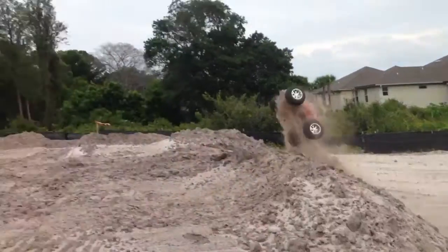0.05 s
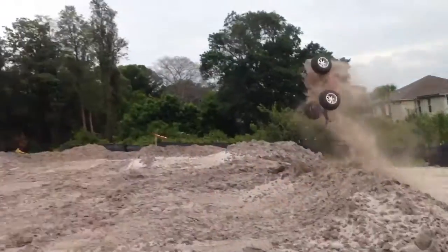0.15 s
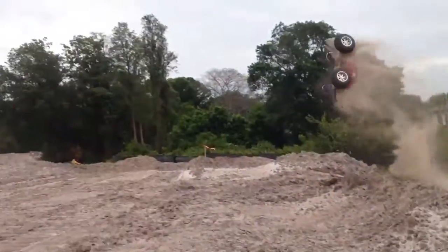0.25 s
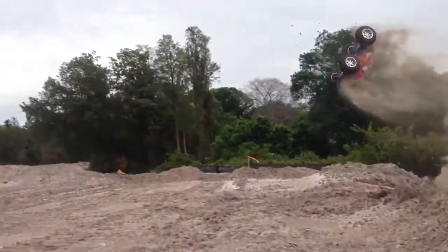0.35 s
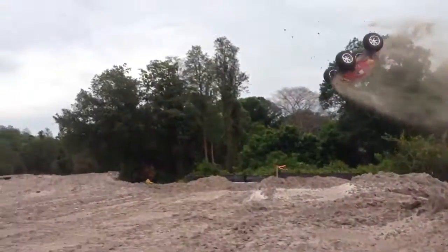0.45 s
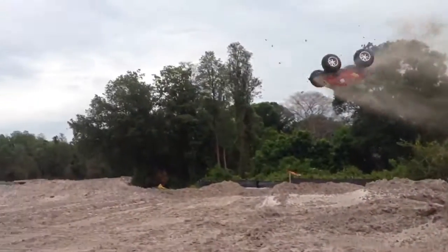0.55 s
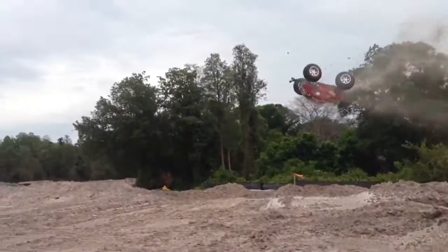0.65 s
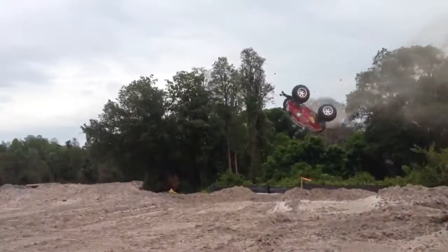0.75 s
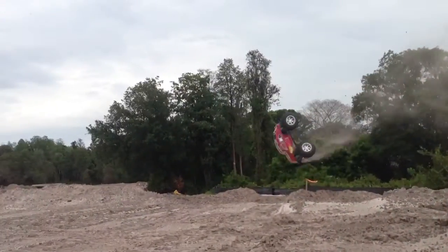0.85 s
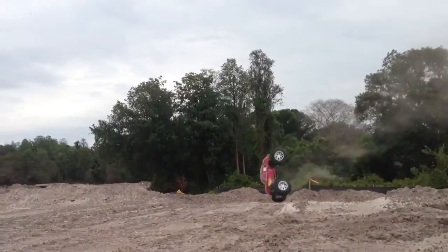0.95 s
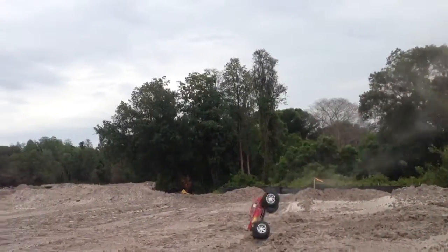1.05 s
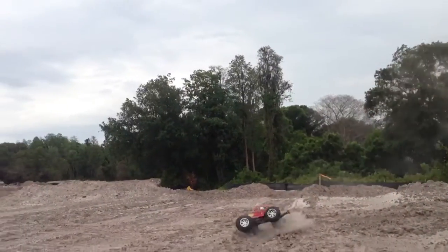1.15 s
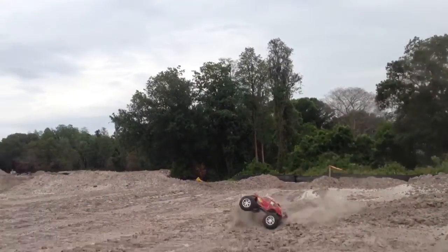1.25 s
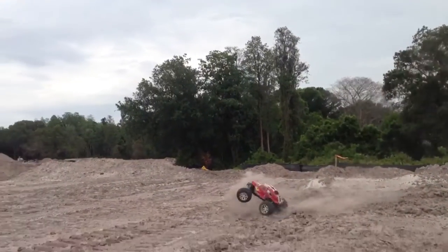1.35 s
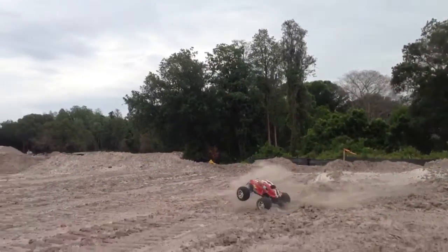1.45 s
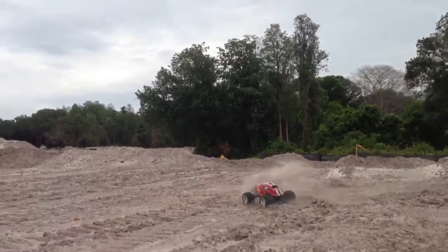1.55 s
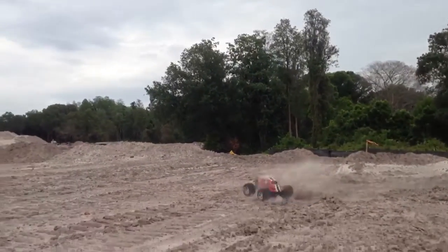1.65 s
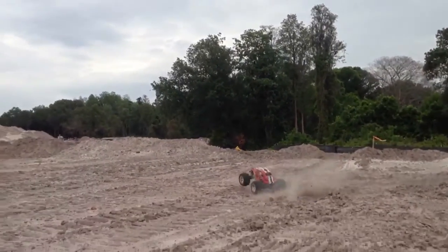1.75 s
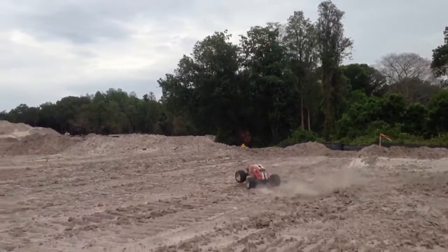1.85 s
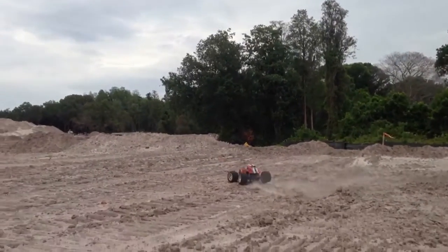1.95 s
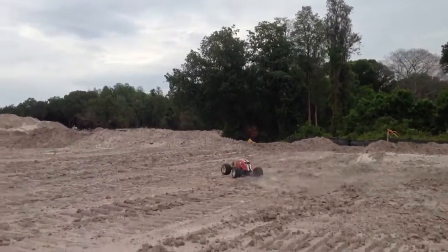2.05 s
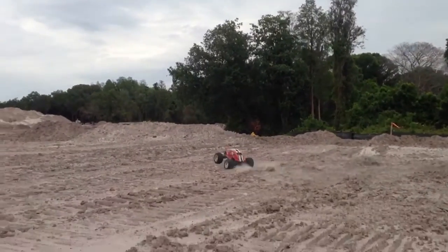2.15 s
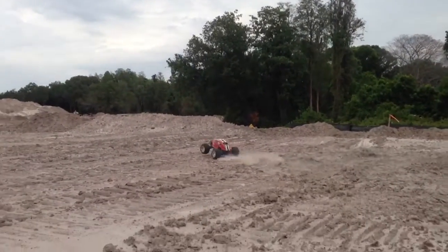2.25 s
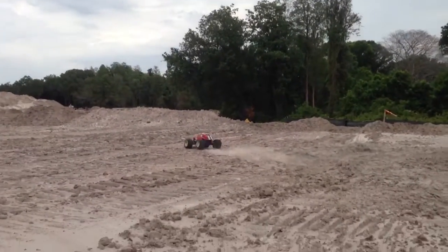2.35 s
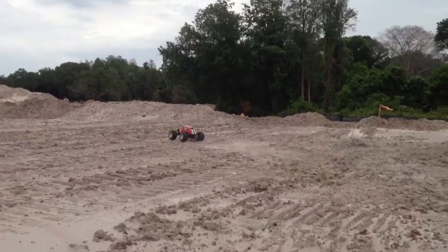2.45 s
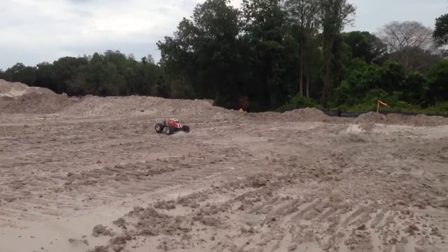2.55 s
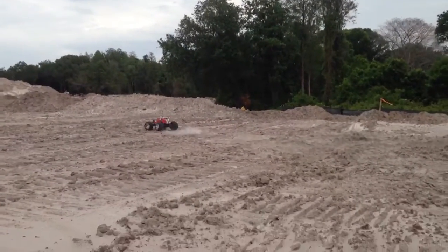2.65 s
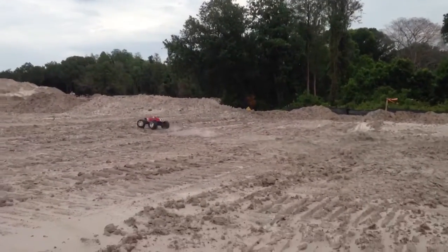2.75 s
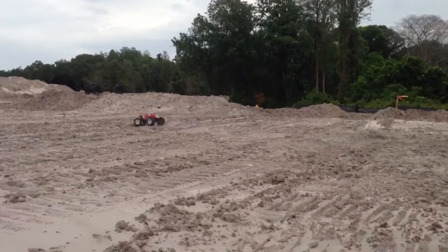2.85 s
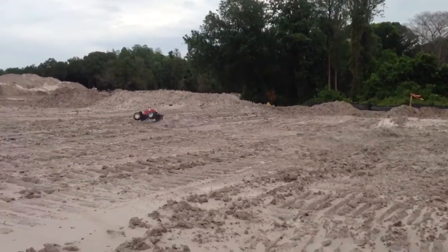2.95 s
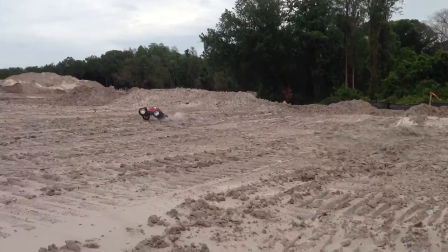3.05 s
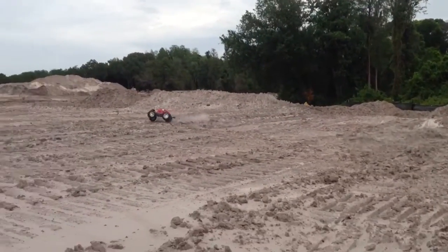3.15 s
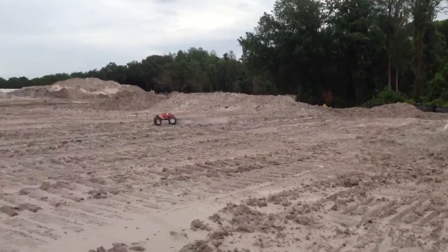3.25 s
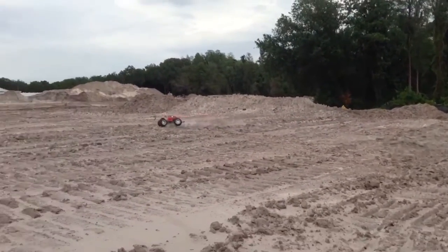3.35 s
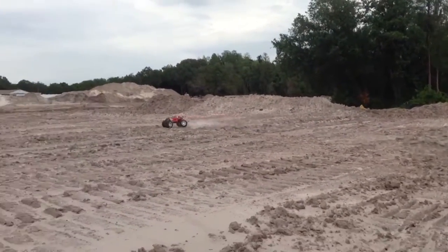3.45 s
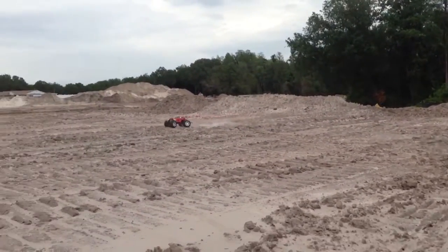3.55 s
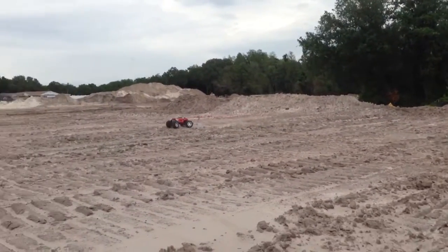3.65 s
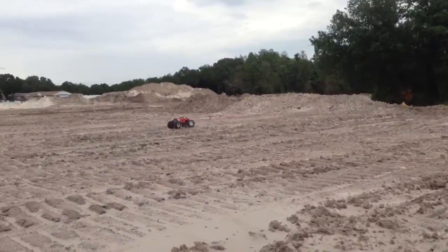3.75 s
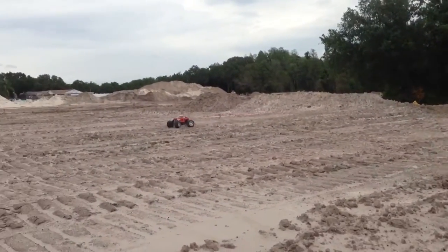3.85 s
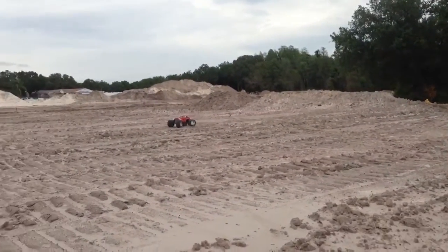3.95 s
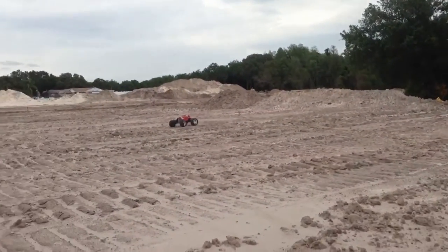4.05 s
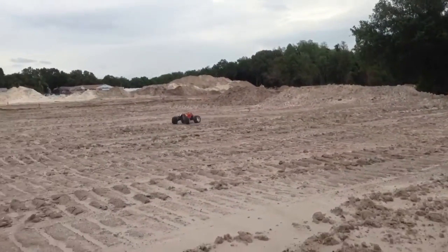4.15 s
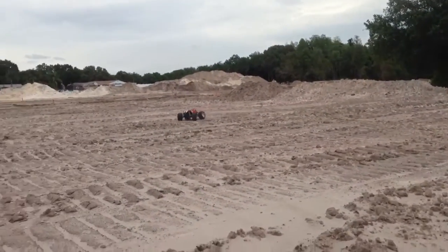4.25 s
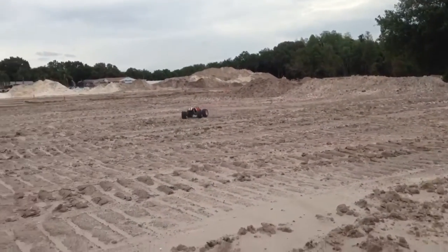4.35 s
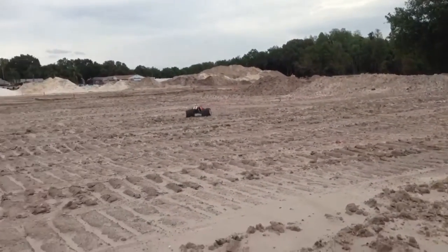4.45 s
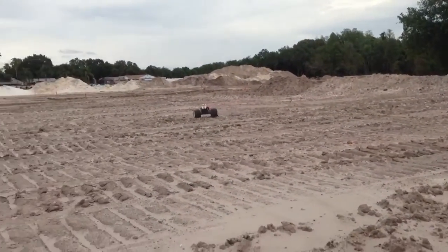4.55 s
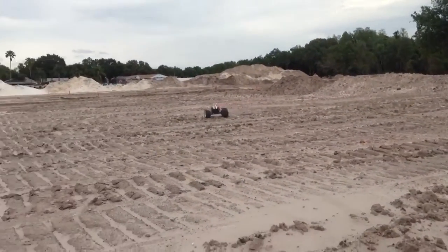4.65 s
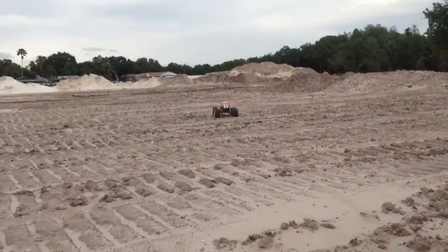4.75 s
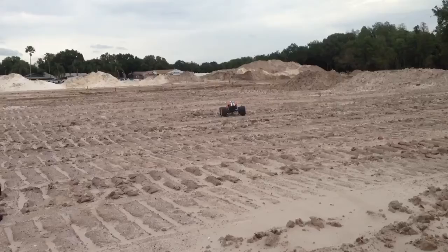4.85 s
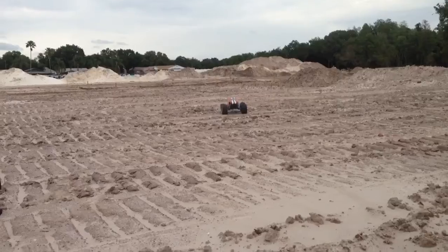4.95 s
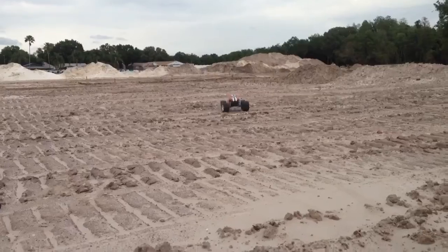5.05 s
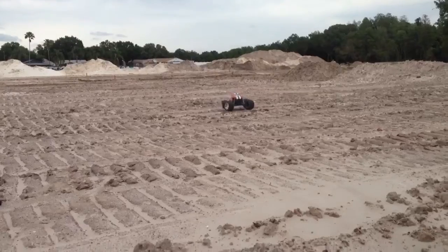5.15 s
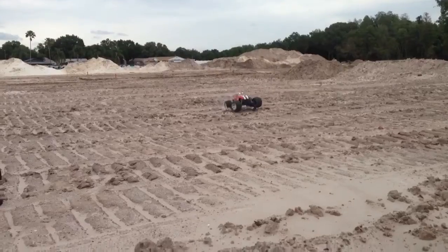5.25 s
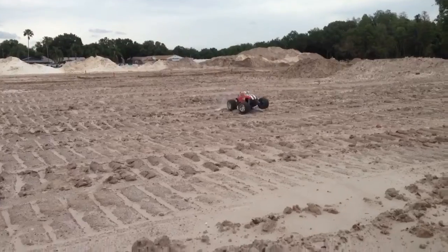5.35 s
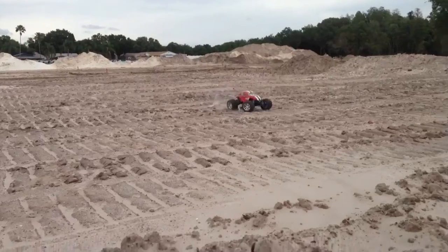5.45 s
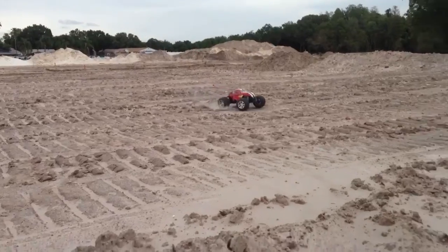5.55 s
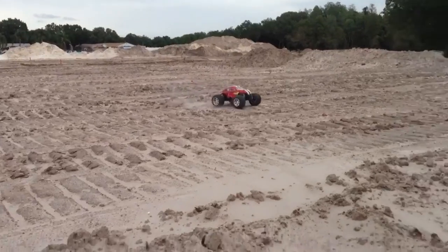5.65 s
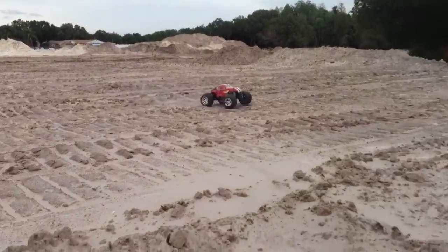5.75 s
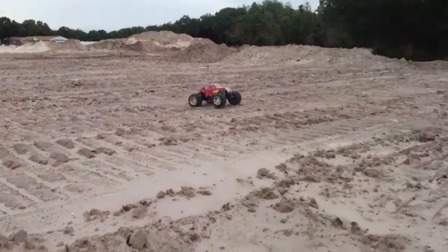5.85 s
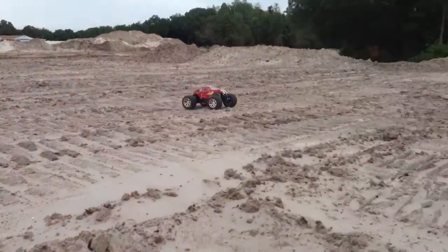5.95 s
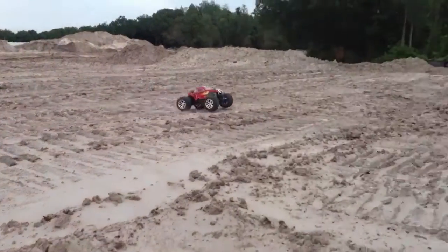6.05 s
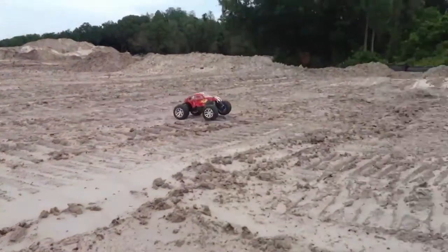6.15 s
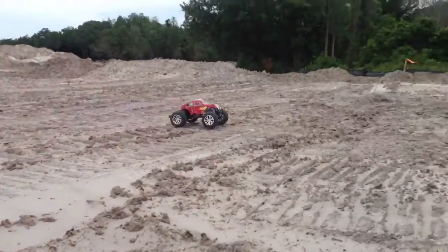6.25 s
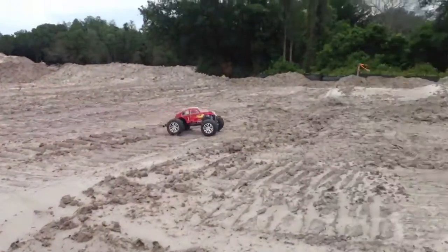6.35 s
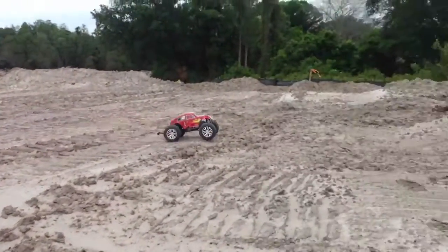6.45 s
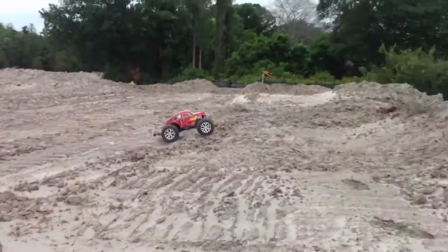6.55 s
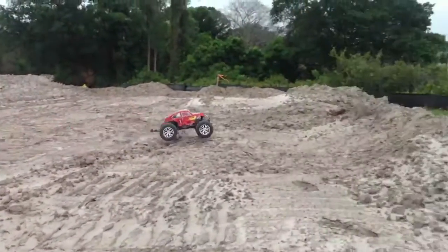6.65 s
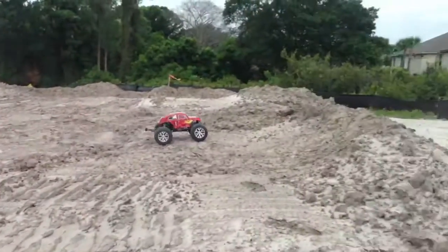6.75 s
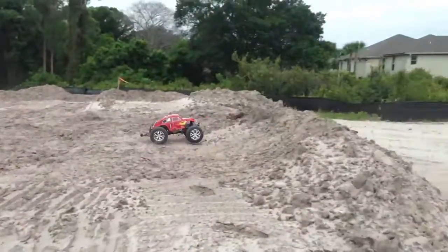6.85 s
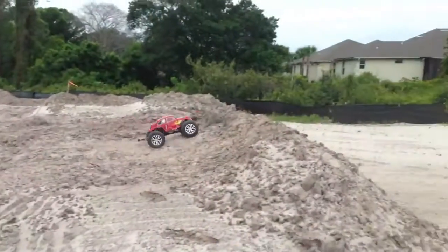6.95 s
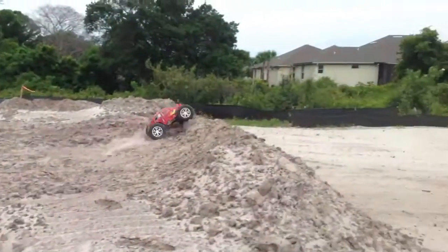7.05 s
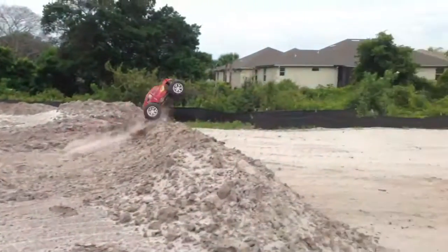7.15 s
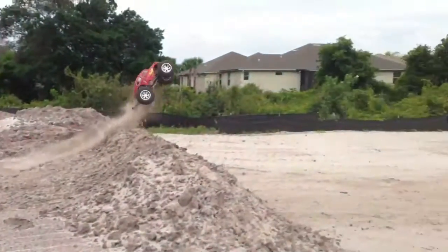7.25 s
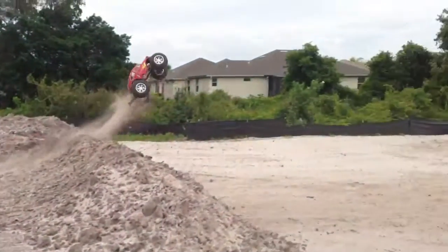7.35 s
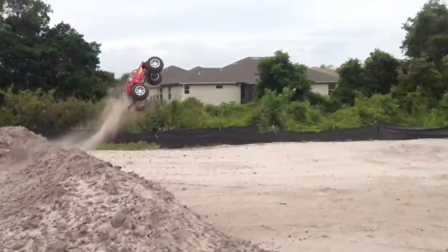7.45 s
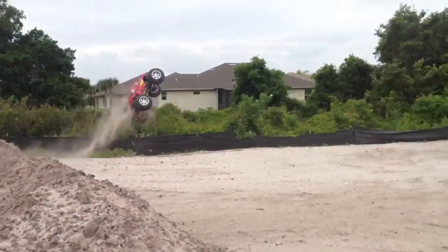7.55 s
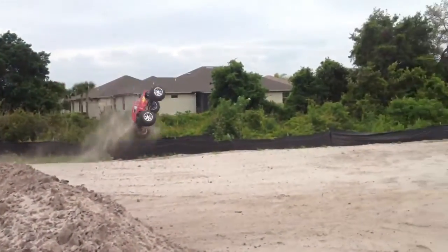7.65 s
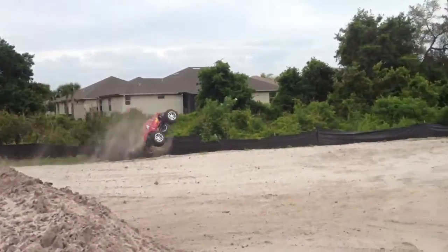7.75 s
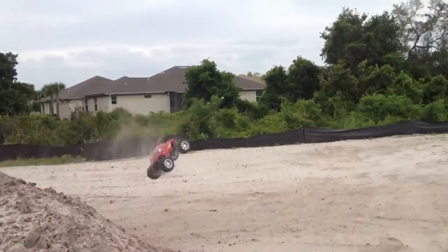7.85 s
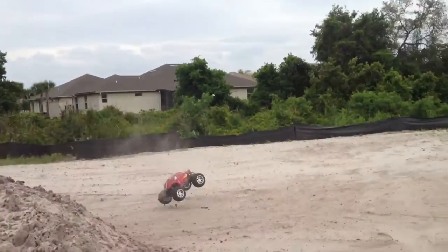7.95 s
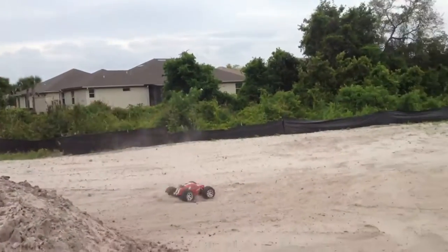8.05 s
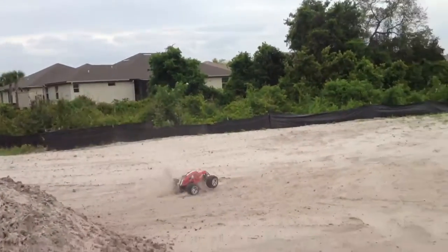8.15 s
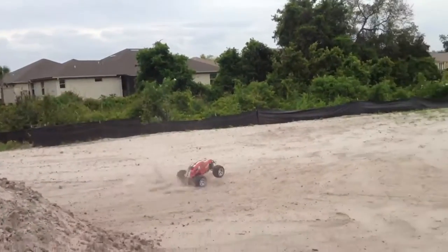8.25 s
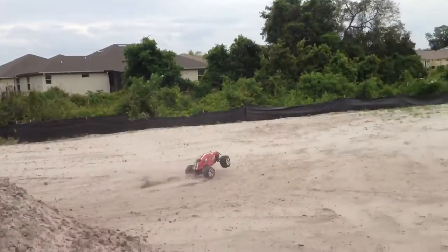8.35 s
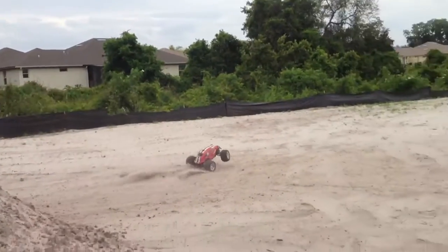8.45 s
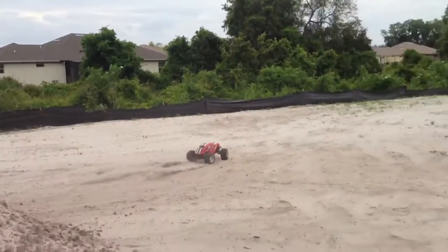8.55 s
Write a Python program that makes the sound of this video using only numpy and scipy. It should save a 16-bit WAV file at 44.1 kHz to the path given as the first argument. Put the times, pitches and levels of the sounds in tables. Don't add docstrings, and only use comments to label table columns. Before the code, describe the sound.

A radio-controlled electric truck screams off a dirt mound with a bright, raspy gear whine, flies, then lands with low damped thuds. Short revs chirp as its wheels slip, and it grows quiet farther away. It returns buzzing over ruts, revs hard for a second jump, lands and pulls away. Open ground, faint distant traffic, one microphone some metres off, almost no echo.

```python
import sys
import numpy as np
from scipy import signal
from scipy.fft import rfft, irfft, next_fast_len
from scipy.io import wavfile
from scipy.ndimage import uniform_filter1d

SR = 44100
rng = np.random.default_rng(int(sys.argv[2]) if len(sys.argv) > 2 else 0)


def store_wav(level_fs):
    pcm = np.round(np.clip(np.atleast_2d(level_fs), -1, 1) * 32767)
    wavfile.write(sys.argv[1], SR, pcm.T.astype(np.int16))


def invert_db(level):
    return 10 ** (np.asarray(level, dtype=float) / 20)


N = 378819
TIME_S = np.arange(N) / SR
CONTROL_S = np.arange(0, N + 32, 32) / SR
PINION_TEETH = 11.5


def level(x, db):
    return x * invert_db(db) / np.sqrt(np.mean(x ** 2))


def smooth(control):
    return np.interp(TIME_S, CONTROL_S, control)


def curves(spans):
    s, *columns = np.vstack(spans).T
    return [np.interp(TIME_S, s, column) for column in columns]


def walk(rate):
    hold = max(int(SR / rate), 1)
    steps = np.repeat(rng.standard_normal(N // hold + 1), hold)
    return 1.3 * uniform_filter1d(uniform_filter1d(steps, hold), hold)[:N]


def colour(x, points):
    hz, db = np.transpose(points)
    size = next_fast_len(N)
    f = np.maximum(np.arange(size // 2 + 1) * SR / size, 1)
    gain = invert_db(np.interp(np.log(f), np.log(hz), db))
    return irfft(rfft(x, size) * gain, size)[:N]


def ring(x, modes):
    out = 0
    for k, (hz, width, db) in enumerate(modes):
        b, a = signal.iirpeak(hz, hz / width, SR)
        twice = signal.lfilter(b, a, signal.lfilter(b, a, x))
        out = out + (-1) ** k * invert_db(db + 2.4 * walk(12)) * twice
    return out


# (f/Hz, level/dB)
FIELD_SPECTRUM = [(15, -60), (30, -50), (75, -10), (134, 4), (180, 1), (305, -10), (598, -20), (722, -17),
                  (782, -28), (848, -17), (1570, -31), (5280, -26.5), (7700, -30.5), (8810, -27),
                  (11500, -26), (15500, -28)]


def field():
    flicker = invert_db(.8 * walk(1.5) + 2.2 * walk(10))
    air = colour(rng.standard_normal(N), FIELD_SPECTRUM)
    rumble = signal.sosfilt(signal.butter(2, 350, fs=SR, output="sos"), air)
    return level(air + rumble * (flicker - 1), -60.27)


# (t/s, tooth mesh f/Hz, whine level/dB re shell, overtone level/dB re whine)
SPEED = [(.2, 2330, 0, -8), (.3, 2400, -2, -14), (1.15, 2480, -3, -14), (1.2, 1945, -1, -10),
         (1.29, 1900, -3, -10), (1.55, 650, -5, -3), (2.9, 800, -6, -3), (4.2, 880, -4, 1),
         (4.7, 900, -4, 1), (4.85, 1000, 3, -7), (5.2, 1140, -4, -5), (5.5, 950, -3, -2),
         (5.72, 1070, -1, -3), (6.09, 1290, -3, -2), (6.5, 1440, -3, -2), (6.95, 1500, -4, -3)]
# (t/s, mesh f/Hz, whine level/dB re shell, overtone level/dB)
REVS = [
    [(0, 1950, -2, -2), (.032, 2220, 1, -1), (.058, 2130, 2, 0), (.07, 1930, -2, 0), (.11, 2190, 0, 1),
     (.15, 2000, 1, -1)],
    [(1.615, 640, 0, 0), (1.66, 940, -1, 0), (1.685, 940, 1, 0), (1.705, 1060, 3, -1), (1.74, 1050, 3, -4),
     (1.765, 1450, 4, -2), (1.79, 1540, 1, 0), (1.9, 1000, -6, -3)],
    [(2.085, 860, 2, -3), (2.13, 1200, 5, -4), (2.15, 1345, 6, -4), (2.2, 1360, 7, -5), (2.23, 1500, 8, -7),
     (2.275, 1490, 8, -9), (2.31, 1270, 4, -8), (2.42, 1000, -7, -3)],
    [(2.52, 1100, 4, -4), (2.58, 1450, 7, -8), (2.62, 1400, 8, -11), (2.66, 1350, 7, -11),
     (2.69, 1180, -2, -6)],
    [(3.02, 900, 0, 0), (3.05, 1165, -2, -2), (3.075, 1165, -4, -3), (3.1, 1480, -1, 0),
     (3.18, 1500, -2, -2), (3.3, 1000, -5, -3)],
    [(7.05, 1790, 1, -1), (7.083, 1900, 1, 0), (7.102, 2060, 2, -1), (7.13, 1770, 0, 0),
     (7.147, 2060, 3, 0), (7.166, 2510, 2, 0), (7.196, 2480, 2, 0), (7.223, 1790, 3, 1),
     (7.232, 2130, 0, -3), (7.27, 2050, 0, -6), (7.5, 2050, -3, -10)],
    [(7.7, 1250, -3, -3), (8.17, 800, -6, -3), (8.2, 1000, 4, -8), (8.25, 1140, -1, -2),
     (8.33, 1250, 0, -3), (8.5, 1320, 1, -3), (8.58, 1050, -1, -3)],
]


def speed():
    mesh_hz, sing_db, overtones_db = curves(sorted(SPEED + sum(REVS, [])))
    return uniform_filter1d(mesh_hz, size=250), sing_db, overtones_db


# (multiple of mesh rate, level/dB re shell)
ORDERS_HEARD = [(.63, -24), (1, -7.5), (1.45, -8), (2, -8), (2.9, -8), (3.02, -15), (4, -14), (4.4, -13),
                (5.8, -11)]
# (f/Hz, level/dB)
BODY = [(600, -3), (1400, 1), (2500, 4), (3100, 0), (4200, -1), (5100, 6), (8000, 8), (9500, -4),
        (11500, -34)]
# (t/s, level/dB, unused; every chirp rises by CHIRP_DB)
CHIRPS = [(4.3583, -53), (4.4282, -50), (4.4805, -47), (4.5309, -45), (4.6057, -47), (4.6716, -48),
          (4.7055, -49), (4.7983, -48), (4.8542, -48), (4.8991, -49), (5.0517, -47), (5.1106, -43),
          (5.2223, -41), (5.388, -49), (5.4987, -48), (5.5571, -49), (5.6244, -42), (5.6883, -45),
          (5.7397, -45), (5.7741, -48), (5.817, -43), (5.8998, -44), (5.9816, -36), (6.0644, -38),
          (6.1043, -38), (6.2814, -40), (6.3623, -44), (6.4785, -39)]
CHIRP_DB, CHIRP_MS = 7.5, 11
SECOND_STAGE = 1.45
UNLOADED_DB, COASTING_DB = -5, -2.5
LOAD_SINGS, HEAVY_DB = .25, -44


def whine(shell_db, mesh_hz, sing_db, overtones_db):
    turn = 2 * np.pi * np.cumsum(mesh_hz * (1 + .008 * walk(40) + .005 * walk(90))) / SR
    wobble = 1 + 0.44 * np.sin(turn / PINION_TEETH)
    chirps = sum(np.exp(-.5 * ((CONTROL_S - s - .012) * 1000 / CHIRP_MS) ** 2) for s, _ in CHIRPS)
    pushing = smooth(sum((CONTROL_S > rev[0][0]) & (CONTROL_S < rev[-1][0]) for rev in REVS))
    out = 0
    for multiple, db in ORDERS_HEARD:
        slack = .55 * np.sqrt(multiple) * walk(120)
        fades_most = multiple == SECOND_STAGE or multiple >= 4
        db = db + (1 - pushing) * (COASTING_DB + UNLOADED_DB * fades_most)
        db = db + overtones_db * (multiple > 1.1) + 3 * walk(45) + 2 * walk(110)
        out = out + invert_db(db) * np.sin(multiple * turn + slack)
    sing_db = sing_db + CHIRP_DB * smooth(chirps) + LOAD_SINGS * np.maximum(shell_db - HEAVY_DB, 0)
    return invert_db(shell_db - 1.5 + sing_db) * wobble * colour(out, BODY), turn


# (t/s, level/dB, shell level/dB re clatter as the truck turns)
ROLL = [(0.0, -40.6, -6.7), (0.3, -42.8, -1.5), (0.5, -43.6, -6.5), (1.1, -46.6, -6.5), (1.4, -69.5, 2.5),
        (2.4, -58.2, -9.2), (3.55, -65.7, -8.1), (4.03, -68.9, -15.5), (4.2, -50.5, -16),
        (4.6, -49.5, -10.0), (5.1, -46.2, -11.3), (5.4, -48.0, -14.1), (6.0, -36.8, -12.0),
        (6.9, -40.1, -13.0), (7.4, -80.0, -12.5), (8.0, -53.3, -9.3), (8.3, -41.5, -12.4),
        (8.59, -39.5, -10.7)]
# (peak t/s, peak level/dB, 20 dB rise t/s, 20 dB fall t/s, shell level/dB re clatter)
BURSTS = [(0.085, -26.3, 0.082, 0.244, -10.5), (1.175, -28.5, 0.039, 0.137, -3.9),
          (1.276, -40.8, 0.488, 0.28, -6.0), (1.574, -40.4, 0.037, 0.358, -21.1),
          (1.736, -32, 0.177, 0.106, -9.2), (1.91, -45.2, 0.036, 0.042, -6.0),
          (2.133, -34.1, 0.15, 0.204, -12.3), (2.532, -40.0, 0.105, 0.245, -13.5),
          (2.838, -52.5, 0.033, 0.046, -13.3), (3.067, -35.8, 0.086, 0.088, -9.7),
          (3.158, -39.0, 0.23, 0.075, -11.2), (3.403, -54.2, 0.6, 0.092, -13.6),
          (3.727, -48.3, 0.13, 0.301, -11.3), (3.994, -60.5, 0.187, 0.03, -13.0),
          (4.16, -49.4, 0.162, 0.599, -10.2), (5.196, -44.0, 0.174, 0.119, -6.1),
          (6.026, -39.2, 0.03, 0.121, -9.4), (6.434, -33, 0.121, 0.31, -19.2),
          (7.1, -28, 0.13, 0.147, -10.7), (7.18, -29.5, 0.06, 0.25, -5.9),
          (7.434, -46.0, 0.03, 0.408, -8.6), (7.738, -39, 0.143, 0.222, -11.0),
          (8.092, -41.4, 0.07, 0.144, -10.4), (8.2, -38.5, 0.03, 0.2, -11.7)]


def load(mesh_hz):
    roll_db, facing_db = curves(ROLL)
    power, ringing = 0, 0
    for s, db, rise, fall, shell_db in BURSTS:
        away = np.where(CONTROL_S < s, (s - CONTROL_S) / rise, (CONTROL_S - s) / fall)
        burst = invert_db(db - 20 * np.minimum(away, 4) ** 1.5) ** 2
        power = power + burst
        ringing = ringing + burst * invert_db(shell_db) ** 2
    effort_db = 10 * np.log10(invert_db(roll_db) ** 2 + smooth(power))
    shell_db = .2 + 10 * np.log10(invert_db(roll_db + facing_db) ** 2 + smooth(ringing))
    chassis_db = -58 + .66 * (effort_db + 45) - 2.2 * np.log2(mesh_hz / 1400)
    return effort_db, shell_db, chassis_db


def teeth(turn, scatter_db, knock):
    tooth = (turn / (2 * np.pi)).astype(int)
    force = invert_db(scatter_db * rng.standard_normal(N)[tooth])
    runout = 1 + knock * np.sin(turn / PINION_TEETH + 1.08 * walk(20))
    return rng.standard_normal(N) * force * runout


# (f/Hz, level/dB per Hz)
CLATTER = [(1760, -31), (3000, -15.5), (4320, -22.5), (4690, -18), (5020, -12.5), (7030, -4), (7800, 4.5),
           (8640, -8), (9390, -9), (10300, -13.5), (11600, -30.5), (12800, -30), (15500, -38)]
# (f/Hz, width f/Hz, level/dB)
SHELL = [(2050, 505, 12), (2480, 635, 14.5), (3150, 910, 1.5), (4000, 1350, 6.5)]
# (f/Hz, width f/Hz, level/dB)
CHASSIS = [(665, 146, 4.5), (1000, 285, 4.5), (1250, 240, 4), (1580, 530, 4)]


def clatter(turn, clatter_db, shell_db, chassis_db):
    bright = colour(teeth(turn, 2.2, .12), CLATTER)
    shell = ring(teeth(turn, 2.5, .2), SHELL) * invert_db(1.5 * walk(30))
    chassis = ring(teeth(turn, 2.5, .2), CHASSIS) * invert_db(2 * walk(25))
    return level(bright, clatter_db - .3) + level(shell, shell_db - 4.0) + level(chassis, chassis_db - 6.0)


# (t/s, change of level/dB)
HOPS = [(0.062, -4), (0.108, -4), (1.237, -7.8), (1.32, -10.8), (1.395, -11.8), (1.531, -10.8),
        (1.8, -10.0), (1.884, -7.3), (2.304, -11.6), (2.389, -6.5), (2.761, -10.8), (2.936, -11.9),
        (2.994, -10.6), (3.216, -9.2), (3.418, -7.7), (4.507, -7.2), (5.371, -7.7), (5.54, -6.0), (5.6, -7),
        (6.042, -8.9), (6.09, -6.0), (6.859, -6.7), (6.968, -6.0), (7.021, -7.9), (7.305, -6.0),
        (7.855, -9.4), (7.973, -5.6), (8.12, -13.4), (8.144, -7.7), (8.562, -7.7)]
# (t/s, change of level/dB)
BUMPS = [(0.13, 2.5), (0.371, 4.9), (0.773, 3.7), (1.447, 4), (1.839, 8.3), (1.934, 12.7), (1.961, 13.6),
         (2.357, 9.9), (2.556, 7.7), (2.6, 5), (2.727, 6), (2.864, 5.5), (2.958, 3.3), (3.223, 14.0),
         (3.364, 7.0), (3.399, 11.8), (3.458, 6.7), (3.626, 9.0), (3.979, 5.7), (5.392, 8), (5.631, 2.5),
         (6.836, 3), (6.99, 5), (6.942, 7.8), (7.282, 3.2), (7.365, 3), (7.465, 5.4), (7.899, 7.3),
         (8.038, 7.7), (8.095, 4.2)]
# (t/s, level/dB, unused; every snap lifts by
# SNAP_DB after a lull of SNAP_LULL_DB)
SNAPS = [(0.072, -13), (1.186, -15), (1.563, -29), (1.957, -33), (2.012, -35), (2.461, -37), (2.783, -41),
         (3.063, -20), (3.622, -40), (6.938, -25), (7.1, -16), (7.117, -15), (7.889, -32), (8.035, -32),
         (8.068, -28), (8.191, -24)]
HOP_MS, BUMP_MS = 8.5, 7.5
SNAP_DB, SNAP_LULL_DB, SNAP_MS = 3.8, -5.2, 11


def ruts():
    db = 0
    for table, ms in ((HOPS, HOP_MS), (BUMPS, BUMP_MS)):
        for s, change_db in table:
            db = db + change_db * np.exp(-.5 * ((CONTROL_S - s) * 1000 / ms) ** 2)
    for s, _ in SNAPS:
        late = (CONTROL_S - s) * 1000 / SNAP_MS
        db = db + np.where(late < 0, SNAP_LULL_DB, SNAP_DB) * np.exp(-np.abs(late))
    return invert_db(smooth(db) + 1.1 * walk(50) + 1.2 * walk(30))


# (t/s, length t/s, f/Hz, level/dB)
BITES = [(.016, .054, 2170, -51), (.075, .068, 2010, -51), (.1, .061, 2050, -41), (.17, .048, 2310, -53),
         (.278, .072, 2085, -59), (.323, .097, 2415, -59), (.5, .15, 2450, -62), (.956, .12, 2480, -58),
         (1.195, .037, 2370, -42.5), (1.257, .047, 1940, -51), (1.678, .029, 1900, -49.5),
         (1.745, .029, 2065, -50), (2.127, .04, 1920, -57), (3.004, .047, 2775, -57),
         (3.045, .04, 1690, -58), (5.104, .07, 2270, -57.5), (5.194, .079, 2285, -60),
         (5.613, .031, 2330, -55.5), (5.965, .062, 2425, -49.5), (6.056, .022, 2520, -55),
         (6.095, .022, 2590, -54), (6.277, .025, 2580, -56), (6.435, .025, 2580, -56),
         (6.475, .025, 2770, -54), (6.195, .055, 2615, -57), (6.339, .062, 2105, -59),
         (6.62, .049, 2885, -58), (7.089, .035, 1970, -50), (7.278, .027, 2570, -44),
         (7.285, .062, 2040, -55), (7.33, .06, 2060, -54), (7.434, .044, 2090, -55.5),
         (7.463, .027, 2025, -49), (7.635, .03, 1900, -58)]
# (t/s, length t/s,
# start f/Hz, end f/Hz, level/dB)
SLIDES = [(1.162, .03, 7600, 4300, -41), (1.618, .049, 893, 1300, -58), (1.658, .058, 1330, 1410, -60),
          (2.101, .041, 1521, 1620, -55), (2.16, .03, 5900, 6050, -49), (3.002, .093, 2240, 2320, -61),
          (3.036, .057, 1167, 1150, -63), (3.05, .041, 6800, 6460, -41), (5.682, .17, 2140, 2180, -63),
          (5.856, .078, 1106, 1208, -66), (7.034, .044, 1797, 1730, -61), (7.275, .025, 2950, 2550, -48),
          (1.7, .03, 4600, 4700, -54), (7.188, .051, 589, 723, -61), (5.971, .06, 3610, 3570, -64),
          (7.683, .15, 1250, 1230, -64), (8.186, .055, 1097, 1600, -61), (8.225, .11, 1595, 1750, -57.5),
          (8.335, .16, 590, 600, -71), (8.09, .025, 1150, 1050, -52), (8.09, .025, 1600, 1650, -56),
          (8.1, .022, 720, 700, -54), (8.055, .04, 660, 680, -60), (8.022, .016, 2250, 2280, -58),
          (8.038, .022, 2350, 2300, -58), (8.2, .05, 2900, 3000, -60), (3.07, .1, 660, 670, -68),
          (.062, .03, 7700, 8000, -36), (.07, .08, 2800, 3150, -52), (1.158, .018, 950, 800, -56),
          (1.2, .025, 720, 680, -59), (1.25, .05, 2600, 2700, -53), (.18, .25, 2050, 2120, -63),
          (.55, .2, 2100, 2050, -64), (.235, .05, 1550, 1480, -66), (.02, .04, 6000, 6400, -42),
          (7.09, .04, 7900, 7700, -36), (7.06, .04, 7300, 7400, -40), (1.16, .03, 2700, 1950, -46),
          (7.35, .025, 6350, 6050, -52), (8.507, .042, 1333, 1190, -63)]


def bites():
    out = np.zeros(N + SR)
    shake, flutter = .65 * walk(150), invert_db(3.5 * walk(70))
    steady = [(s, length, hz, hz, db) for s, length, hz, db in BITES]
    for s, length, start_hz, end_hz, db in steady + list(SLIDES):
        start, size = int(s * SR), int(length * SR)
        turn = 2 * np.pi * np.cumsum(np.linspace(start_hz, end_hz, size)) / SR
        now = np.minimum(start + np.arange(size), N - 1)
        swell = invert_db(db + 5.0) * signal.windows.tukey(size, .6) * flutter[now]
        out[start:start + size] += swell * np.sin(turn + shake[now])
    return np.sqrt(2) * out[:N]


def tree_line(truck):
    t = np.arange(SR // 4) / SR
    scatter = rng.standard_normal(SR // 4) * invert_db(-60 * t / 0.15)
    return invert_db(-35.5) * signal.fftconvolve(truck, scatter)[:N]


# (t/s, peak level/dB, ring f/Hz, 60 dB decay t/s)
THUDS = [(0.716, -37, 290, 0.04), (1.147, -38, 194, 0.18), (1.169, -38.5, 187, 0.14),
         (1.22, -37, 172, 0.096), (1.28, -44.5, 188, 0.14), (1.359, -36.5, 222, 0.054),
         (1.489, -41, 207.6, 0.062), (6.819, -45, 144, 0.11), (7, -48.5, 188, 0.1192),
         (8.059, -46, 180.3, 0.099), (8.085, -41, 130, 0.1), (8.102, -34, 122.6, 0.12),
         (8.132, -39, 144, 0.09)]
KNOCK_HZ, KNOCK_DB, KNOCK_T60_S = 660, -19, .08
GRIT_DB, SQUASH_S = -14, .008


def thuds():
    out, t = np.zeros(N + SR), np.arange(SR // 2) / SR
    earth = rng.standard_normal((len(THUDS), len(t)))
    for (s, db, hz, t60), noise in zip(THUDS, earth):
        crumble = signal.lfilter(*signal.butter(2, [90, 500], "band", fs=SR), noise)
        grit = signal.lfilter(*signal.butter(1, [400, 2000], "band", fs=SR), noise ** 3)
        shape = np.minimum(t / SQUASH_S, 1) * invert_db(-60 * t / max(t60, .01))
        knock_hz = KNOCK_HZ * (1 + noise[0] / 20)
        knock = invert_db(KNOCK_DB - 60 * t / KNOCK_T60_S) * np.sin(2 * np.pi * knock_hz * t)
        tyre = np.sin(2 * np.pi * hz * t) + 2.6 * crumble + invert_db(GRIT_DB) * grit
        out[int(s * SR):][:len(t)] += invert_db(db) * (shape * tyre + knock)
    return out[:N]


def scene():
    mesh_hz, *song = speed()
    effort = load(mesh_hz)
    tones, turn = whine(effort[1], mesh_hz, *song)
    truck = ruts() * (tones + clatter(turn, *effort)) + bites()
    return np.tile(truck + tree_line(truck) + thuds() + field(), (2, 1))


def gate_top(x):
    hz, _, cells = signal.stft(x, SR, nperseg=1024)
    power = uniform_filter1d(np.abs(cells) ** 2, size=3, axis=1) + 1e-18
    treble = power[(hz > 5000) & (hz < 10000)].mean(0)
    mood_db = 7 * uniform_filter1d(rng.standard_normal(len(treble)), size=13)
    for edge in range(10300, 15500, 350):
        band = (hz >= edge) & (hz < edge + 350)
        reach_db = 24 + 2.6 * (edge - 11000) / 1000 + 5.5 * (edge < 10900)
        whim_db = mood_db + 7 * uniform_filter1d(rng.standard_normal(len(treble)), size=13)
        cells[band] *= power[band].mean(0) > treble * invert_db(whim_db - reach_db) ** 2
    return signal.istft(cells, SR, nperseg=1024)[1][:N]


def band_limit(x):
    return signal.sosfilt(signal.butter(12, 15780, fs=SR, output="sos"), x)


def record(dry):
    top_cut = signal.ellip(8, .2, 70, 15400, fs=SR, output="sos")
    heard = gate_top(signal.sosfilt(top_cut, dry[0]))
    return band_limit(np.tile(heard, (2, 1)))


dry = scene()
out = record(dry)
store_wav(out)
```